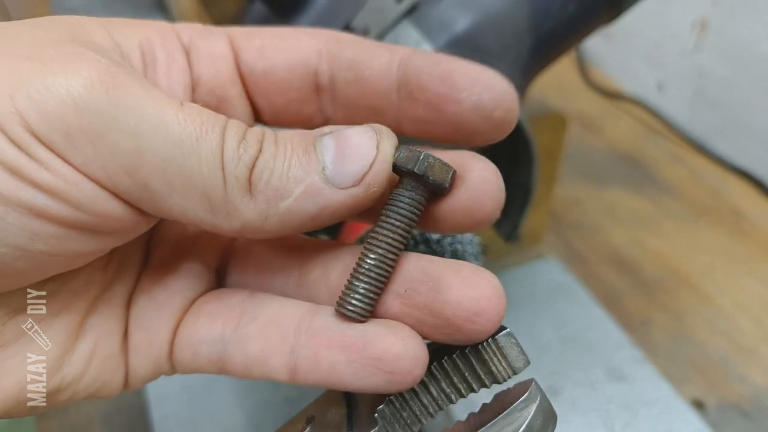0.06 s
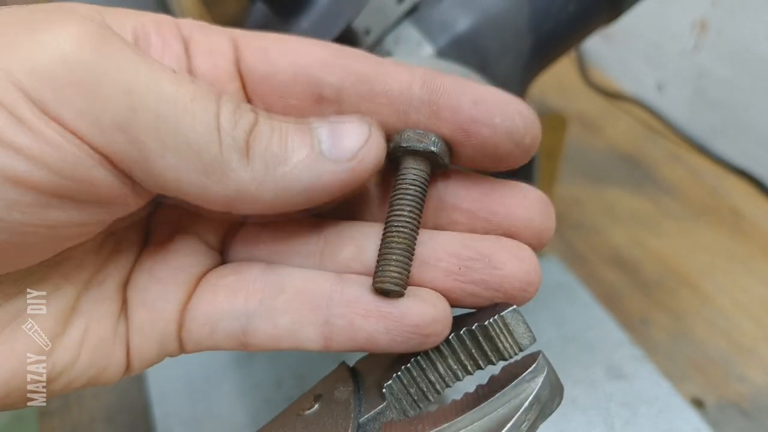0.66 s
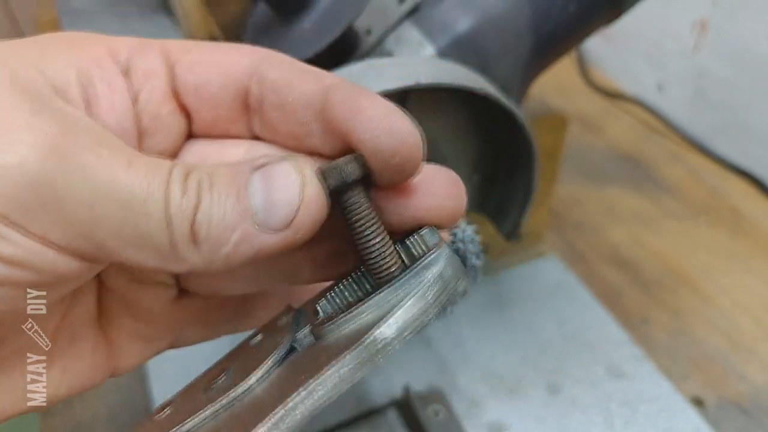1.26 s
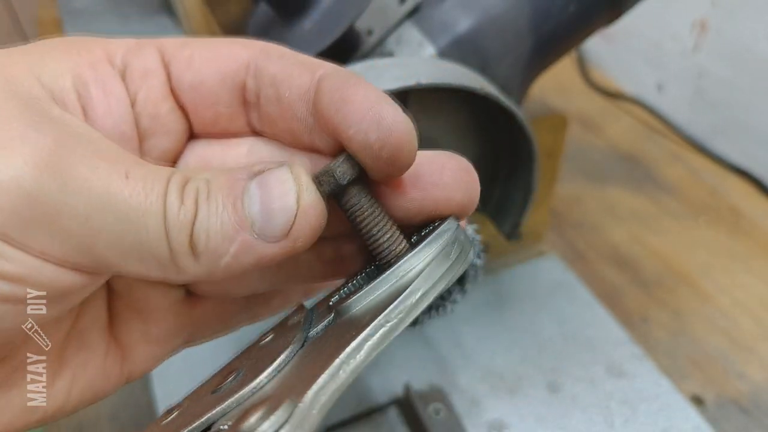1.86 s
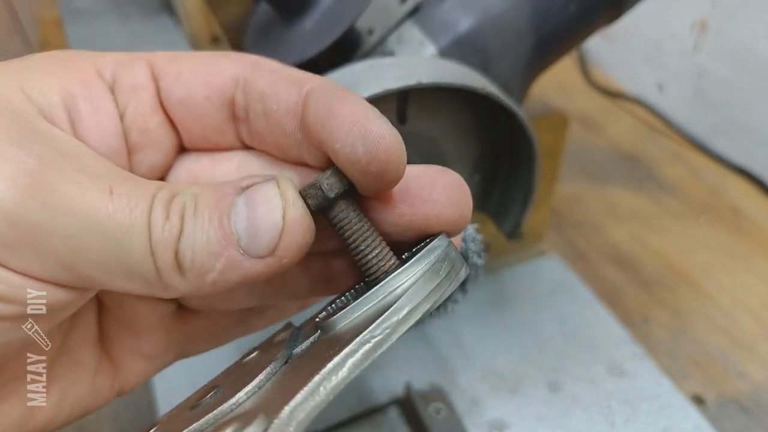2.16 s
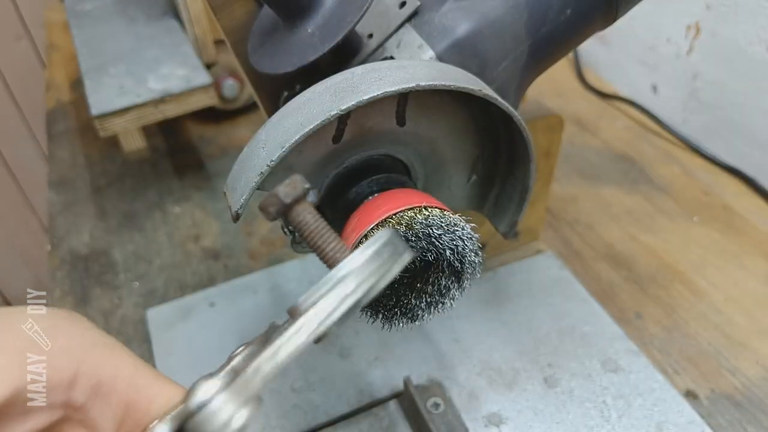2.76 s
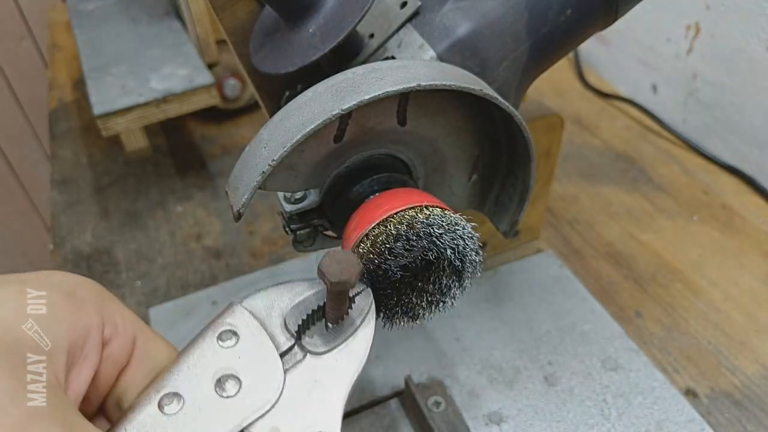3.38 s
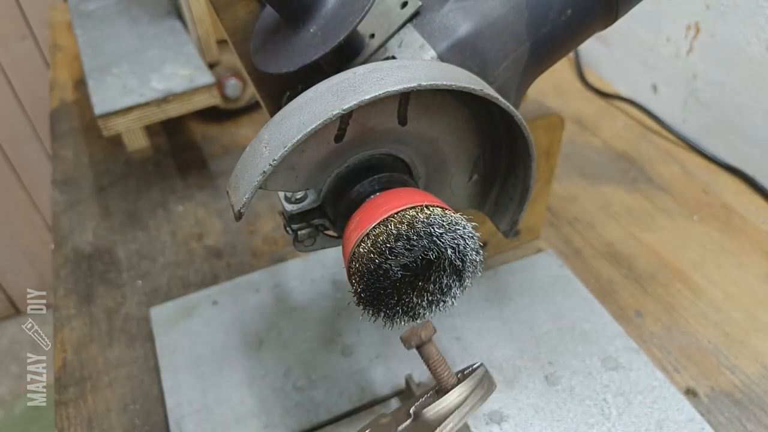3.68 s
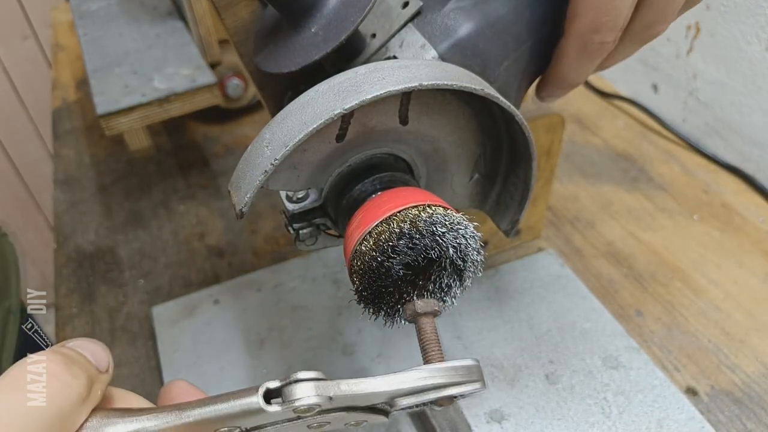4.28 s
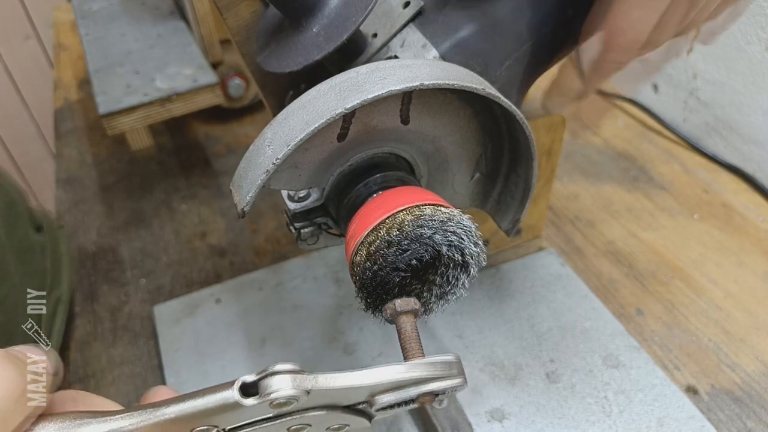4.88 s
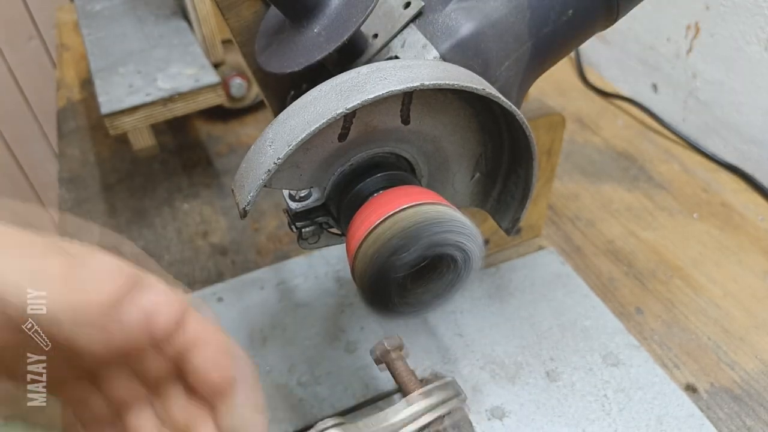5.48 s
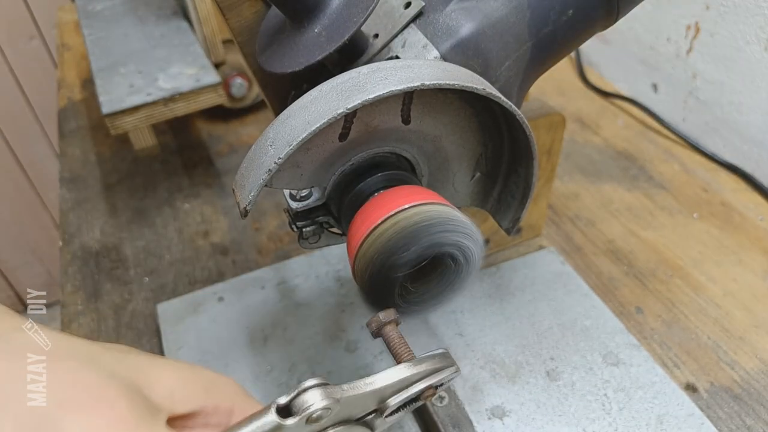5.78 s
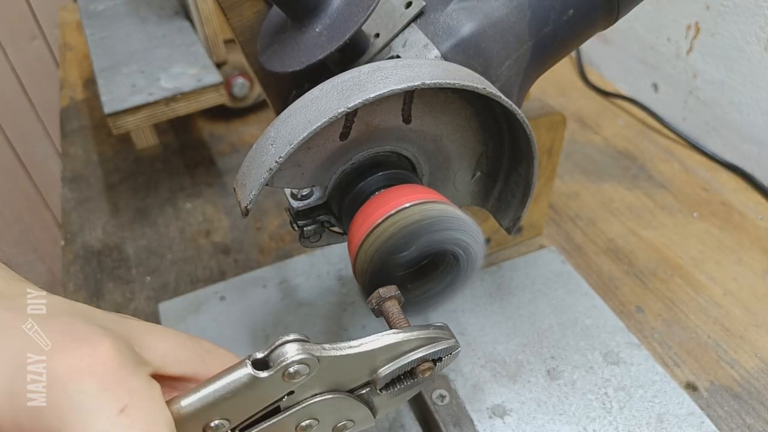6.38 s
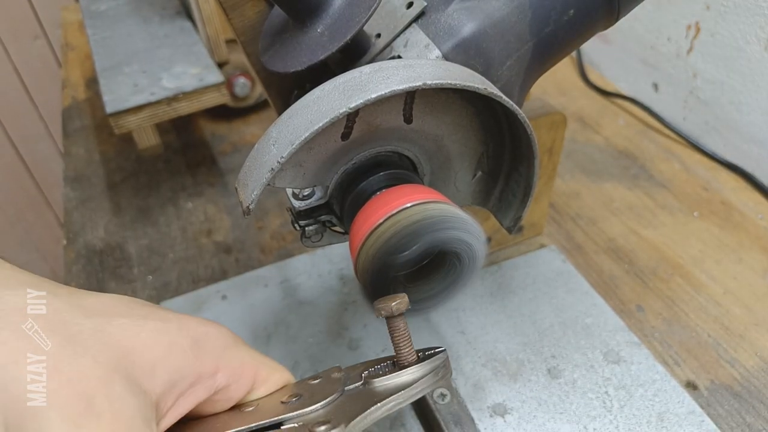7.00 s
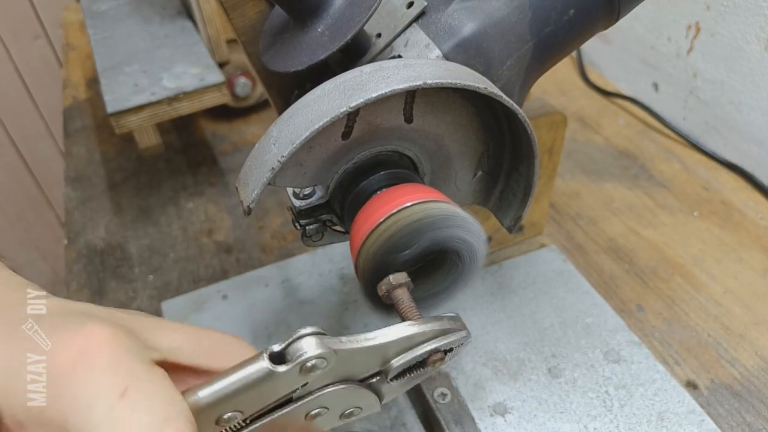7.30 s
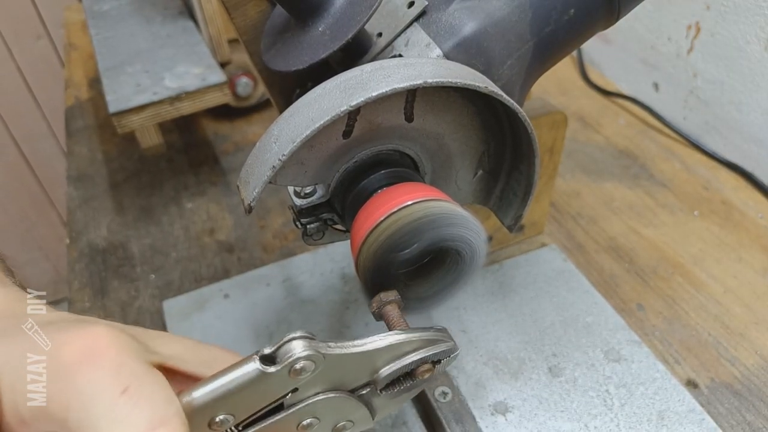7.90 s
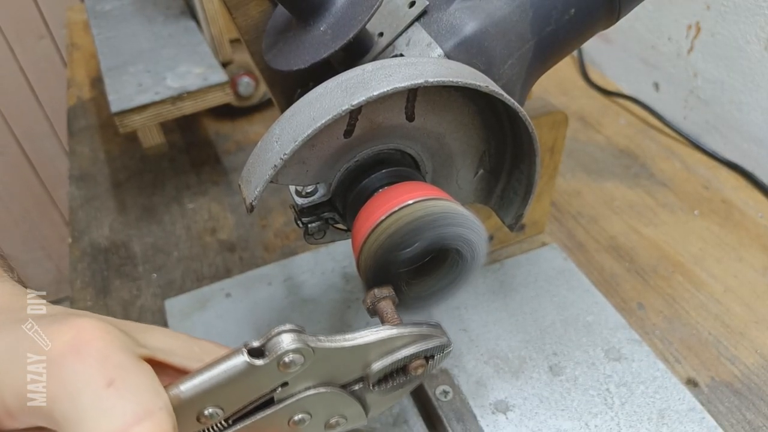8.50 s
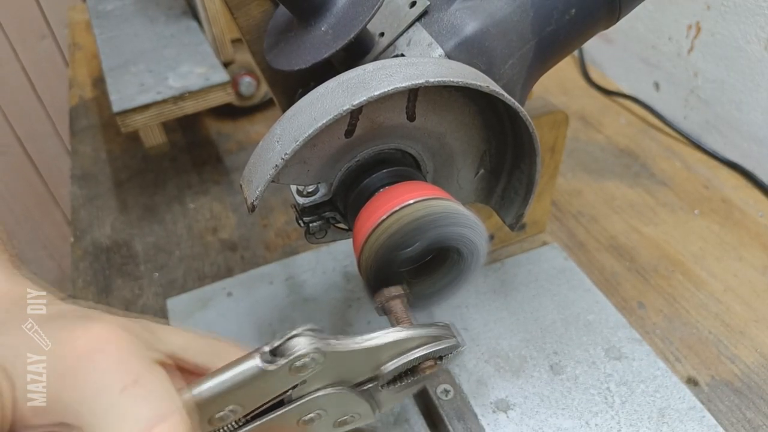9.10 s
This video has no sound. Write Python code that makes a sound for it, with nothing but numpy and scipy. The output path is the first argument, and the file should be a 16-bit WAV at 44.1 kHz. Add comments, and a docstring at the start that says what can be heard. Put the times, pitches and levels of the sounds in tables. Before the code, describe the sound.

Metal pliers tick and snap onto a bolt before an angle grinder revs up into a rattling, hissing wire-brush roar.

```python
"""Wire-brushing a bolt

Locking pliers clink and snap shut on a bolt; a hand slides over an angle grinder on the bench.
The switch clacks, the motor hums and rattles up to speed through its gears, and the wire cup
brush scrubs the bolt, slowing a little under the load. A small workshop, heard from close by."""
import sys
import numpy as np
from scipy import signal
from scipy.fft import rfft, irfft, next_fast_len
from scipy.io import wavfile

SR = 44100
rng = np.random.default_rng(int(sys.argv[2]) if len(sys.argv) > 2 else 0)


def digitize_waveform(pressure):
    """Quantize a signal to 16-bit integers and store it at the path in sys.argv[1].

    Rows of a 2-D input are taken as channels; values are limited to [-1, 1].
    """
    field = np.atleast_2d(pressure).T
    bounded = np.clip(field, -1, 1)
    quanta = np.round(bounded * 32767).astype(np.int16)
    wavfile.write(sys.argv[1], SR, quanta)


N = 407925
TIME = np.arange(N) / SR
PINION_TEETH, CROWN_TEETH = 11, 41
# rotor speed: t/s, f/Hz
ROTOR_SPEED = [(4.87, 10), (5.2, 62), (5.6, 136), (5.75, 178), (5.95, 232), (6.1, 266), (6.3, 309),
               (6.62, 361), (6.86, 368), (7.11, 393), (7.41, 404), (7.64, 404), (7.91, 398), (8.73, 373.5),
               (9.25, 373)]


def from_db(db):
    """Decibels to gain."""
    return np.exp(np.asarray(db) * (np.log(10) / 20))


def rms_one(x):
    """Scale to rms 1."""
    return x / np.sqrt(np.mean(x ** 2) + 1e-20)


def panned(pan_db):
    """Left and right gains; positive is left."""
    return from_db(np.array([[pan_db], [-pan_db]]) / 2)


def add(track, start_s, sound):
    """Mix in a short sound."""
    at = round(start_s * SR)
    track[:, at:at + sound.shape[1]] += sound[:, :N - at]


def ramp(start_s, length_s):
    """Linear rise from 0 to 1."""
    return np.clip((TIME - start_s) / length_s, 0, 1)


def held(start_s, hold_s, attack_s, release_s):
    """Linear attack; exponential release from hold_s after the start."""
    return ramp(start_s, attack_s) * np.exp(-np.maximum(TIME - start_s - hold_s, 0) / release_s)


def bell(x, centre, width):
    """Gaussian of height 1."""
    return np.exp(-.5 * ((x - centre) / width) ** 2)


def humps(x, rows):
    """Summed bells; rows: centre, width, level/dB."""
    return sum(from_db(db) * bell(x, centre, width) for centre, width, db in rows)


def growth(rotor_hz, knee_hz, power):
    """Power law of speed, levelling off at 1 above the knee."""
    rise = (rotor_hz / knee_hz) ** power
    return rise / np.sqrt(1 + rise ** 2)


def eased(drop_db=-7.5):
    """Gain step as the bolt is eased off the brush."""
    return from_db(drop_db * ramp(start_s=8.61, length_s=0.057))


def drift(rate_hz):
    """Unit normal draws, linearly interpolated."""
    count = int(N / SR * rate_hz) + 2
    return np.interp(np.arange(N) * rate_hz / SR, np.arange(count), rng.standard_normal(count))


def tone(cycles):
    """Sine of rms 1, random start phase."""
    phase = (cycles - np.floor(cycles) + rng.random()).astype(np.float32)
    return np.sqrt(2) * np.sin(2 * np.pi * phase)


def at_hz(points, size):
    """Curve over log frequency, read at each FFT bin."""
    hz, value = np.transpose(points)
    return np.interp(np.log(np.fft.rfftfreq(size, 1 / SR) + 1), np.log(hz), value)


def coloured(x, spectrum, size=8192):
    """Minimum-phase filter of unit power gain: the spectrum sets shape only."""
    cepstrum = irfft(np.log(from_db(at_hz(spectrum, size))))
    cepstrum[1:size // 2] *= 2
    cepstrum[size // 2 + 1:] = 0
    response = irfft(np.exp(rfft(cepstrum)))
    return signal.oaconvolve(x, response[None] / np.linalg.norm(response))[:, :N]


def dulled(x, hz):
    """Second-order low-pass."""
    return signal.lfilter(*signal.butter(2, min(hz, .45 * SR), fs=SR), x)


def spread(pair, echo_s=.0013, echo_share=0.42, echo_top_hz=2200):
    """Unrelated pair to stereo, alike in the bass; a dull bench echo twists the phase."""
    # likeness of the ears: f/Hz, coherence
    likeness = [(60, .995), (330, .995), (380, 0.93), (700, 0.77), (1290, 0.4), (2380, 0.38), (4400, 0.04),
                (8120, 0.08), (15000, 0.13)]
    size = next_fast_len(N, True)
    hz = np.fft.rfftfreq(size, 1 / SR)
    alike = at_hz(likeness, size)
    share = echo_share / (1 + (hz / echo_top_hz) ** 2)
    mid, side = rfft(pair, size)
    echo = 1j * np.sin(2 * np.pi * hz * echo_s) * mid
    side = np.sqrt(1 - share) * side + np.sqrt(2 * share) * echo
    mid, side = mid * np.sqrt(1 + alike), side * np.sqrt(1 - alike)
    return rms_one(irfft(np.array([mid + side, mid - side]), size)[:, :N])


def noise():
    """White stereo noise."""
    return spread(rng.standard_normal((2, N)))


def contact(decay_s):
    """Metal faces chatter briefly: a decaying noise burst."""
    t = np.arange(SR // 5) / SR
    return (rng.standard_normal(len(t)) + 0.76 * rng.standard_normal((2, len(t)))) * np.exp(-t / decay_s)


def workshop(x, wet_db, low_cut_hz=120, t60_s=0.29):
    """Add a short diffuse tail, band-limited and different at each ear."""
    t = np.arange(int(.45 * SR)) / SR
    tail = rng.standard_normal((2, len(t))) * from_db(-60 * t / t60_s) * (t > .004)
    tail = signal.lfilter(*signal.butter(2, low_cut_hz, "high", fs=SR), dulled(tail, hz=13140))
    wet = signal.oaconvolve(x.mean(0)[None], tail / np.linalg.norm(tail[0]), axes=1)[:, :N]
    return x + from_db(wet_db) * wet


def room_tone(level_db=-67, dip_db=-10):
    """Low room rumble; dips briefly after the pliers snap."""
    # rumble spectrum: f/Hz, level/dB
    spectrum = [(12, -40.5), (20, -12), (53, 0.5), (81, -8.5), (193, -13), (410, -25), (446, -21.5),
                (499, -25.5), (1030, -30.5), (5080, -42.5), (7310, -45), (16000, -61.5)]
    dip = held(start_s=2.9, hold_s=0.21, attack_s=.1, release_s=0.24)
    return from_db(level_db + dip_db * dip) * coloured(noise(), spectrum)


def hand():
    """Skin rubs over the plastic housing in tiny slips and shudders where the grip catches."""
    # hand strokes: t/s, hold/s, rub/dB, shudder/dB
    strokes = [(3.568, .06, -81, -78.5), (3.899, 0.047, -54, -68), (3.976, 0.039, -56, -44.5),
               (4.059, 0.021, -53, -52.5), (4.114, 0.23, -51, -71), (4.667, 0.12, -60, -66)]
    # rub and hollow shudder spectra: f/Hz, level/dB
    rub_spectrum = [(530, -44), (900, -22), (1230, -28), (1680, 1), (2070, -7.5), (2450, 1), (2660, -8.5),
                    (3820, -8.5), (4360, -11), (6970, -8), (8980, -16), (9770, -17), (16000, -22)]
    shudder_spectrum = [(59, -53.5), (100, -28), (207, -3.5), (277, -25), (461, 1), (1040, -18),
                        (1160, -14.5), (1340, -35), (1710, -12), (2060, -15), (2190, -35), (2370, -12),
                        (4000, -32.5), (5200, -44), (8800, -120)]
    rub_gain, shudder_gain, friction = 0, 0, noise()
    for start_s, hold_s, rub_db, shudder_db in strokes:
        stroke = held(start_s, hold_s, attack_s=0.019, release_s=0.044)
        rub_gain += from_db(rub_db) * stroke
        shudder_gain += from_db(shudder_db) * stroke
    rub = coloured(friction * from_db(1.8 * drift(500)), rub_spectrum)
    shudder = coloured(friction * from_db(3.0 * drift(130)), shudder_spectrum)
    return rub_gain * rub + shudder_gain * shudder


def knocks():
    """Pliers knock on the bolt, housing and switch clack, gears knock through their slack."""
    # dull knock of pliers on bolt, then housing and switch clacks: t/s, level/dB, decay/s, low-pass/Hz
    handling = [(1.019, -37.5, 0.00254, 1900), (3.902, -53.5, 0.01, 8860), (4.08, -29.5, 0.0062, 3360),
                (4.725, -46.5, 0.014, 17000), (4.762, -30.5, 0.016, 18000), (4.770, -16.5, 0.0033, 11000),
                (4.815, -35, 0.0079, 3000)]
    # gear knocks: t/s, level/dB
    backlash = [(4.885, -23.5), (5.063, -27.5), (5.107, -28), (5.142, -23), (5.226, -24), (5.25, -26)]
    # clack spectrum: f/Hz, level/dB
    spectrum = [(90, -27.5), (200, -10), (370, -14.5), (650, -9.5), (900, -14.5), (1150, -3), (1400, -12.5),
                (2400, -5.5), (3500, -4), (4400, -10.5), (7040, -4.5), (8700, -19.5), (16000, -18.5)]
    clacks = np.zeros((2, N))
    for start_s, db, decay_s, dull_hz in handling:
        add(clacks, start_s, from_db(db) * dulled(contact(decay_s), dull_hz))
    for start_s, db in backlash:
        add(clacks, start_s, from_db(db) * dulled(contact(decay_s=0.0075), hz=4030))
    return workshop(coloured(clacks, spectrum) * panned(-1.5), wet_db=-8.5)


def pliers(ring_trim_db=-17):
    """Each touch on the bolt ticks and rings the steel, with random mode strengths."""
    # touches: t/s, level/dB, decay/s, low-pass/Hz, relative ring/dB, pan/dB
    clinks = [(1.0198, -33, 0.0044, 15000, -14, 9), (1.1767, -27.5, 0.004, 14000, -12, 10),
              (1.361, -50.5, 0.015, 4440, -13, 9), (1.399, -48, 0.0098, 4530, -5, 11),
              (1.414, -55, 0.014, 5500, -11, 12), (1.438, -41.5, 0.0044, 18000, -24, 7),
              (1.552, -72, 0.025, 5000, -8, 6), (1.736, -56.5, 0.0027, 6000, -10, 10),
              (2.407, -72, 0.0058, 15000, -10, 3), (2.904, -36, 0.006, 15000, 14.5, -11.5),
              (3.351, -66.5, 0.014, 15000, -25, 4)]
    # tick spectrum: f/Hz, level/dB
    tick_spectrum = [(240, -72), (400, -41), (865, -28), (1140, -26), (1330, -36.5), (1760, -26.5),
                     (2550, -9.5), (3370, -13), (3810, 0), (4380, -13.5), (5780, -19.5), (7060, -5.5),
                     (7750, -22.5), (11200, -22.5), (16000, -40)]
    # modes of the pliers: f/Hz, level/dB, t60/s
    steel = [(1330, -44.5, 2.2), (2560, -17.5, 0.45), (2790, -25, 0.26), (3220, -18.5, 0.22),
             (3700, 3, 0.26), (3850, -10.5, .2), (4136, -6, .4), (4200, -20.5, 0.74), (4204, -15.5, 1.1),
             (4527, -19.5, 0.29), (4840, -16, .4), (5050, -10.5, 0.43), (5500, -17.5, 0.38),
             (5860, -17, .3), (6520, -16, 0.42), (6560, -16, 0.31), (6790, -13.5, .28), (6860, -10, 0.1503),
             (7160, -12.5, 0.23), (7300, -14.5, 0.48), (8667, -21, .16), (11280, -21.5, .18)]
    ticks, rings = np.zeros((2, N)), np.zeros((2, N))
    t = np.arange(SR) / SR
    hz, mode_db, t60_s = np.transpose(steel)
    modes = np.sin(2 * np.pi * hz[:, None] * t) * from_db(-60 * t / t60_s[:, None])
    for start_s, db, decay_s, dull_hz, ring_db, pan_db in clinks:
        gain = from_db(db) * panned(pan_db)
        add(ticks, start_s, gain * dulled(contact(decay_s), dull_hz))
        strengths = from_db(mode_db + 2 * rng.standard_normal((2, len(hz))))
        add(rings, start_s, gain * from_db(ring_db + ring_trim_db) * (strengths @ modes))
    return workshop(coloured(ticks, tick_spectrum), wet_db=-17) + rings


def toggle(thump_trim_db=-10):
    """The pliers snap shut and rebound: a bright crack, a low thump through the hand."""
    # toggle impacts: t/s, level/dB, decay/s
    snaps = [(2.8932, -26.5, 0.0054), (2.8987, -18, 0.0021), (2.918, -45.5, 0.0059)]
    # crack and thump spectra: f/Hz, level/dB
    crack_spectrum = [(100, -22.5), (300, -19.5), (520, -7), (800, -13), (1200, -8.5), (1560, -16.5),
                      (2000, -10.5), (2900, -19), (3750, -1.5), (4400, -12.5), (6000, -14.5), (6900, -11),
                      (7800, -17), (11700, -15), (16000, -20)]
    thump_spectrum = [(20, -11), (48, -7.5), (90, -17.5), (200, -22.5), (600, -37), (3000, -79)]
    cracks, thumps = np.zeros((2, N)), np.zeros((2, N))
    for start_s, db, decay_s in snaps:
        add(cracks, start_s, from_db(db) * contact(decay_s))
        add(thumps, start_s, from_db(db + thump_trim_db) * contact(decay_s=0.0054)[:1])
    cracks = coloured(cracks, crack_spectrum) * panned(-2)
    return workshop(cracks, wet_db=-4.5, low_cut_hz=1600) + coloured(thumps, thump_spectrum)


def bench(rotor_hz, peak_hz=182, width_hz=75):
    """The bench rumbles most as the speed passes its resonances."""
    # rumble spectrum: f/Hz, level/dB
    spectrum = [(25, -39), (45, -49), (80, -9), (130, 0), (160, -5.5), (250, -15), (500, -43)]
    shaking = from_db(-32) * bell(rotor_hz, peak_hz, width_hz) + from_db(-44.5) * eased()
    return shaking * growth(rotor_hz, knee_hz=59, power=4.1) * coloured(noise(), spectrum)


def motor(rotor_hz, turns, mains_hz=50, free_speed_hz=436):
    """Current hums, falling towards free speed; the unbalanced rotor shakes once a turn."""
    # low thump of the switch, then swells of motor hum: t/s, width/s, level/dB
    swells = [(4.785, 0.017, -37.5), (4.9, .02, -34.5), (5.18, 0.044, -34.5), (5.35, 0.022, -22.5),
              (5.53, 0.052, -25.5), (5.73, 0.017, -23.5), (5.86, .022, -21.5)]
    # mains harmonics: order, level/dB
    hum_orders = [(2, -17), (4, -1.5), (8, -19)]
    # mounting resonances: f/Hz, width/Hz, level/dB
    mount = [(194, 16, -24), (282, 21, -22.5), (385, 48, -30)]
    switched_on = ramp(ROTOR_SPEED[0][0], length_s=0.35)
    current = switched_on * np.maximum(1 - rotor_hz / free_speed_hz, 0)
    hum_gain = from_db(-25.5) * current + humps(TIME, swells)
    hum = sum(from_db(db + 2.2 * drift(25)) * tone(k * mains_hz * TIME + .09 * drift(30))
              for k, db in hum_orders)
    shake_gain = humps(rotor_hz, mount) * eased() * from_db(2.0 * drift(28))
    return (hum_gain * hum + shake_gain * tone(turns + 0.061 * drift(45))) * panned(-1.2)


def brush_cup(turns, bedding_db_per_s=9.5):
    """The pressed cup shakes at the spindle rate; overtones fade as the wires bed in."""
    # bolt leaning on the cup: t/s, attack/s, hold/s, shake/dB, overtones/dB
    leans = [(5.802, 0.087, 0.26, -38.5, -31.5), (6.61, 0.075, .38, -23, -33),
             (7.079, 0.025, 1.553, -24.5, -29), (8.717, 0.28, .52, -18, -43)]
    # spindle harmonics: order, level/dB
    wobble_orders = [(2, -1.5), (3, -8), (5, -7.5)]
    spindle = turns * PINION_TEETH / CROWN_TEETH
    shake_gain, overtone_gain = 0, 0
    for start_s, attack_s, hold_s, shake_db, overtones_db in leans:
        pressure = held(start_s, hold_s, attack_s, release_s=0.079)
        bedding_db = bedding_db_per_s * np.maximum(TIME - start_s, 0)
        shake_gain += pressure * from_db(shake_db)
        overtone_gain += pressure * from_db(overtones_db - bedding_db)
    overtones = sum(from_db(db + 4.9 * drift(15)) * tone(k * spindle) for k, db in wobble_orders)
    shake = from_db(0.45 * drift(3.2)) * tone(spindle)
    return (shake_gain * shake + overtone_gain * overtones) * panned(-0.96)


def casing(x):
    """Gear case and guard colour the sound and throw each pitch to one side."""
    # peaks and notches: f/Hz, width/Hz, level/dB
    resonances = [(476, 54, -6.5), (523, 41, 6.5), (956, 73, -4), (1090, 102, 5), (1346, 78, 2),
                  (1470, 55, 2.5), (1655, 120, -1.5), (1840, 78, 1.5), (2009, 110, 3), (2023, 88, 3),
                  (2284, 50, -1.5), (2358, 120, 4), (2620, 69, 1.5), (2864, 80, -3), (2910, 70, 7.5),
                  (3090, 80, -2), (3418, 170, 6), (3760, 150, 6), (3925, 65, 7), (4000, 50, -1.5),
                  (4190, 110, 6), (4520, 96, 0.5), (4654, 110, 1.5), (5223, 110, 6), (5690, 160, 5),
                  (6340, 140, -5), (6570, 170, 4), (8210, 160, 6), (9420, 400, -1), (13900, 320, -2.5)]
    # radiation balance: f/Hz, left minus right/dB
    balance = [(60, -3.5), (92, -1), (140, 3), (210, -2.5), (330, -1), (500, 2.5), (770, -5), (1170, -0.5),
               (1790, -2), (2740, -1.5), (4190, -4), (6410, -7), (9810, 5.5), (15000, 0)]
    size = next_fast_len(N, True)
    grid_hz = np.arange(5, SR / 2, 5)
    colour_db = sum(db / (1 + (2 * (grid_hz - hz) / width_hz) ** 2) for hz, width_hz, db in resonances)
    ear_db = at_hz(np.c_[grid_hz, colour_db], size) + np.outer([1, -1], at_hz(balance, size)) / 2
    return irfft(rfft(x, size) * from_db(ear_db), size)[:, :N]


def gears(rotor_hz, turns, sing_s=8.3, whine_order=39, fade_db_per_s=20):
    """Teeth clatter, and sing at case resonances and late in the run, as a thin high whine fades."""
    # case resonances swept by the tooth rate: f/Hz, width/Hz, level/dB
    mesh_resonances = [(2194, 210, -22.5), (2820, 110, -31.5)]
    # rotor harmonics: order, level/dB
    clatter_orders = [(11, -7), (12, -6), (13, -14)]
    # mesh tone and sidebands: offset/spindle rates, level/dB
    sidebands = [(0, -0.5), (0.91, -9.5), (-1, -11)]
    resonance = humps(PINION_TEETH * rotor_hz, mesh_resonances)
    clatter_gain = from_db(-32) * growth(rotor_hz, knee_hz=110, power=0.89) * eased() + resonance
    settled = held(sing_s, hold_s=0.25, attack_s=0.25, release_s=1.14)
    sing_gain = from_db(-21) * resonance + from_db(-31) * settled
    whine_db = -30 - fade_db_per_s * np.maximum(TIME - sing_s, 0) + 1.9 * drift(6.4)
    whine_gain = from_db(whine_db) * growth(rotor_hz, knee_hz=333, power=2.1)
    clatter = spread([sum(from_db(db) * drift(220) * tone(k * turns) for k, db in clatter_orders)
                      for _ in range(2)])
    mesh = PINION_TEETH * turns
    sing = sum(from_db(db + 1.8 * drift(18)) * tone(mesh + k * mesh / CROWN_TEETH + .06 * drift(35))
               for k, db in sidebands)
    cycles = whine_order * turns + .22 * drift(80)
    whine = [from_db(3 * drift(45)) * (tone(cycles + .3 * drift(12)) + .1 * tone(cycles - turns))
             for _ in range(2)]
    return (casing(clatter_gain * clatter) + sing_gain * sing * panned(-7.5)
            + whine_gain * rms_one(np.array(whine)) * panned(-1.5))


def roar(rotor_hz, turns):
    """Gears and fan roar, brighter with speed; single knocks merge as the rotor gets faster."""
    # low- and high-speed spectra: f/Hz, level/dB
    slow_spectrum = [(150, -19.5), (260, 2.5), (520, 5), (800, -4), (1100, 0), (2000, 3.5), (2700, 0),
                     (3500, -1.5), (5000, -12.5), (7000, -11), (9000, -32), (16000, -48)]
    fast_spectrum = [(150, -15.5), (260, -5.5), (520, -1), (700, -0.5), (950, -4), (1200, 0.5), (2100, 0.5),
                     (3100, -2), (4200, -4), (5500, -7.5), (7200, -6.5), (8700, -20.5), (16000, -25)]
    rattle_db = np.interp(rotor_hz, [40, 130, 300], [4.3, 2.3, .3])
    shaken = noise() * from_db(rattle_db * drift(140) + .5 * drift(45)) * (1 + 0.12 * tone(turns))
    fast_share = np.clip((rotor_hz - 110) / 190, 0, 1)
    slow = np.sqrt(1 - fast_share) * rms_one(coloured(shaken, slow_spectrum))
    fast = np.sqrt(fast_share) * rms_one(coloured(shaken, fast_spectrum))
    return from_db(-19.5) * growth(rotor_hz, knee_hz=97.4, power=2.02) * (slow + fast)


def wires(rotor_hz, turns, flicks_per_s=9000):
    """Wire tips flick the bolt in a stream that throbs at the spindle rate."""
    # wires catching an edge: t/s, width/s, boost/dB
    bites = [(5.99, 0.033, 2.5), (6.71, 0.052, 6.5)]
    # hiss spectrum: f/Hz, level/dB
    spectrum = [(500, -24), (2000, 3.5), (4500, -5), (7000, 4.5), (8700, -6), (11000, -4.5), (14000, -2.5),
                (16000, -8.5)]
    bite_db = sum(db * bell(TIME, at_s, width_s) for at_s, width_s, db in bites)
    gain = from_db(-31 + bite_db) * growth(rotor_hz, knee_hz=160, power=2.4)
    spindle = turns * PINION_TEETH / CROWN_TEETH
    strengths = rng.standard_normal((2, N))
    hits = rng.random((2, N)) < flicks_per_s / SR * (1 + .35 * tone(spindle))
    return gain * coloured(rms_one(strengths * hits), spectrum) * from_db(.8 * drift(60))


def scene():
    """Handling, then the grinder, over room tone; rotor speed drives the grinder's layers."""
    rotor_hz = np.interp(TIME, *np.transpose(ROTOR_SPEED), left=0)
    turns = np.cumsum(rotor_hz * (1 + 0.00096 * drift(14))) / SR
    tones = motor(rotor_hz, turns) + brush_cup(turns) + gears(rotor_hz, turns)
    grinding = casing(eased() * (roar(rotor_hz, turns) + wires(rotor_hz, turns)))
    grinder = tones + workshop(grinding, wet_db=-8.5) + bench(rotor_hz)
    return grinder + pliers() + toggle() + knocks() + hand() + room_tone()


def record(dry, cutoff_hz=15780):
    """Steep low-pass."""
    return signal.sosfilt(signal.ellip(12, .1, 80, cutoff_hz, fs=SR, output="sos"), dry)


dry = scene()
out = record(dry)
digitize_waveform(out)
```